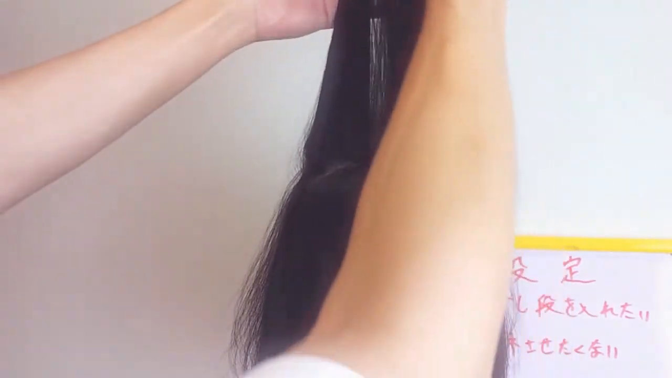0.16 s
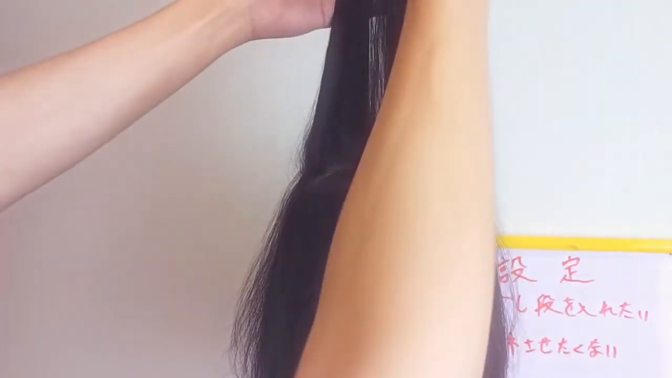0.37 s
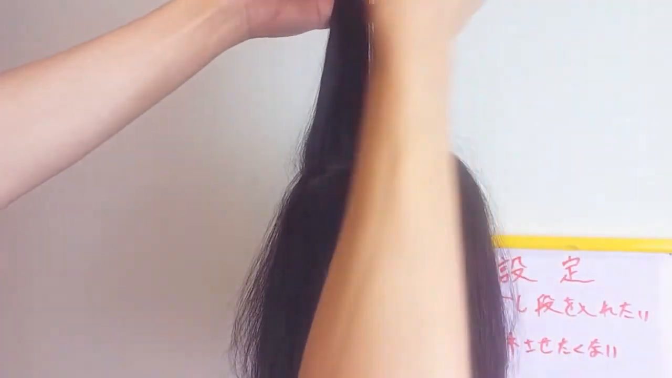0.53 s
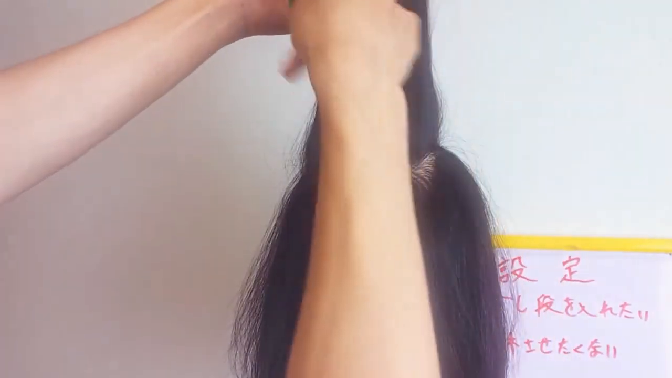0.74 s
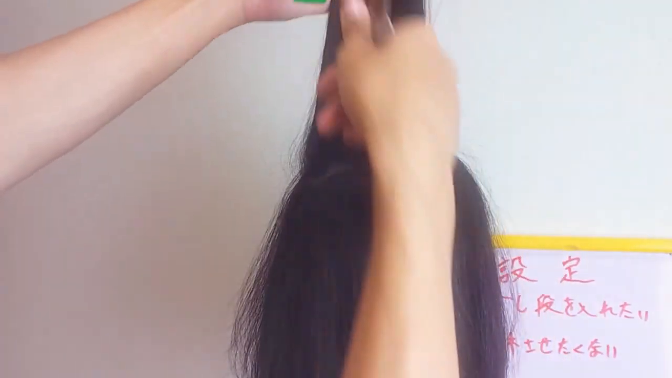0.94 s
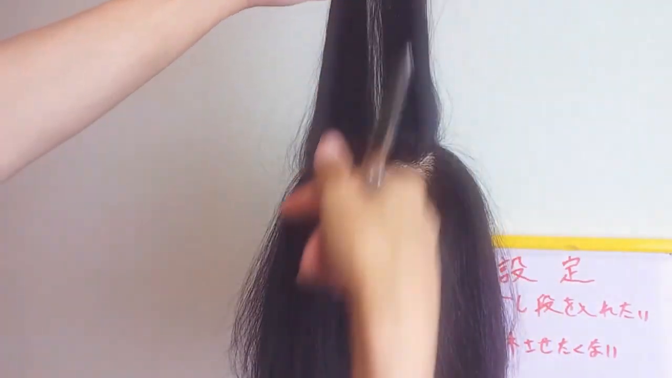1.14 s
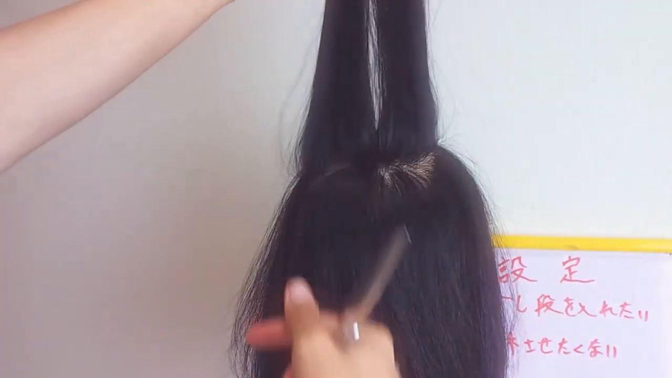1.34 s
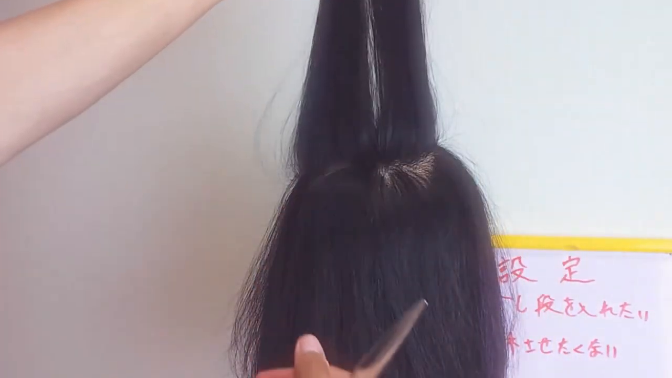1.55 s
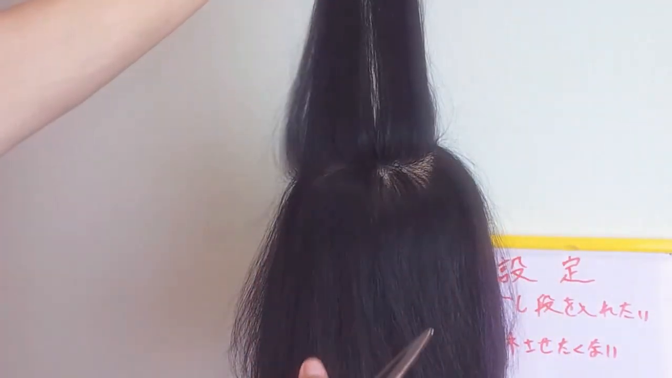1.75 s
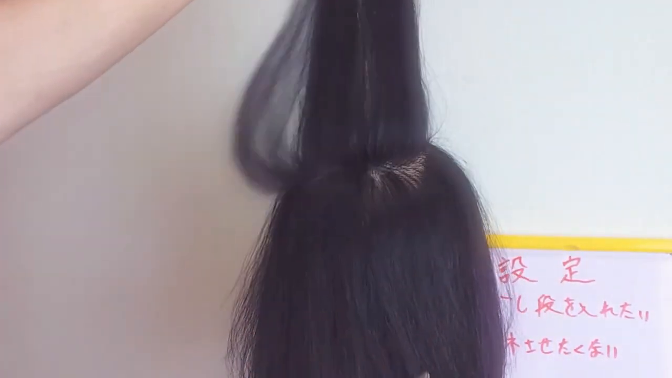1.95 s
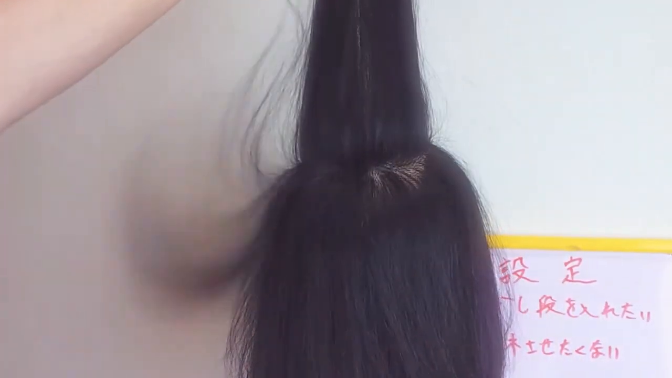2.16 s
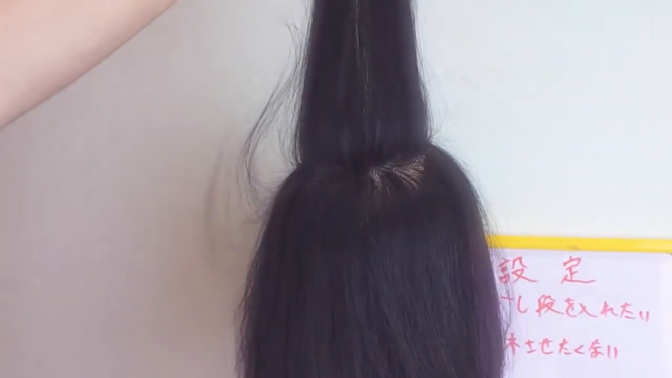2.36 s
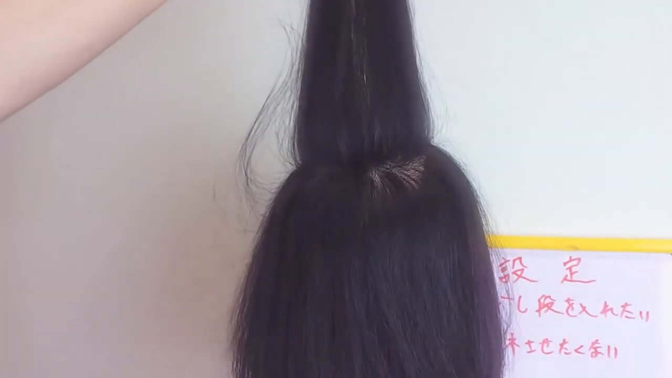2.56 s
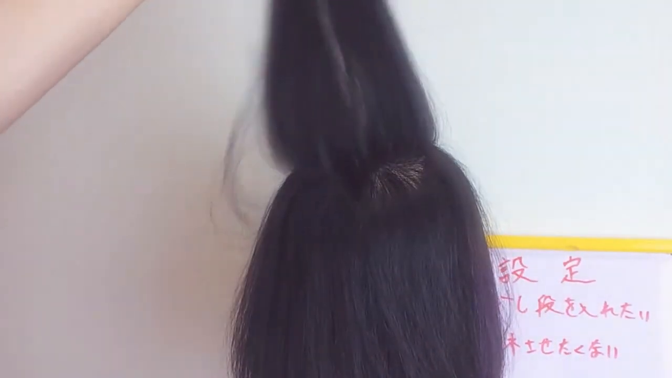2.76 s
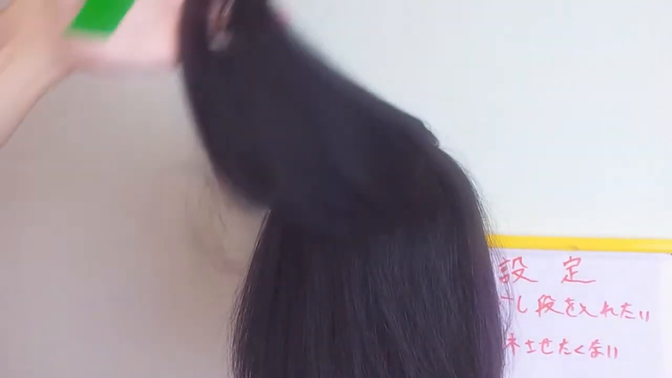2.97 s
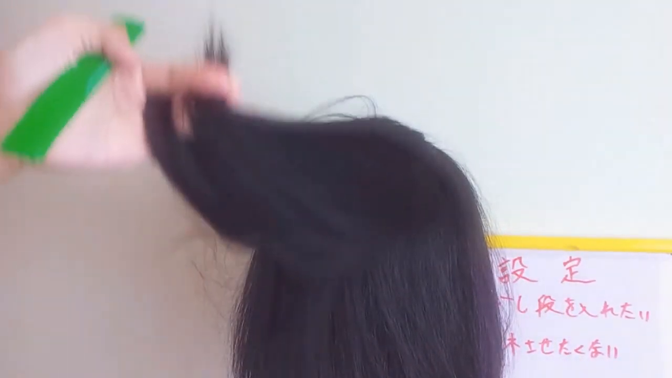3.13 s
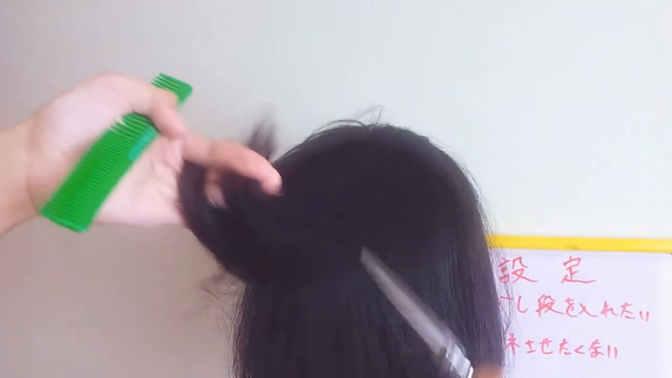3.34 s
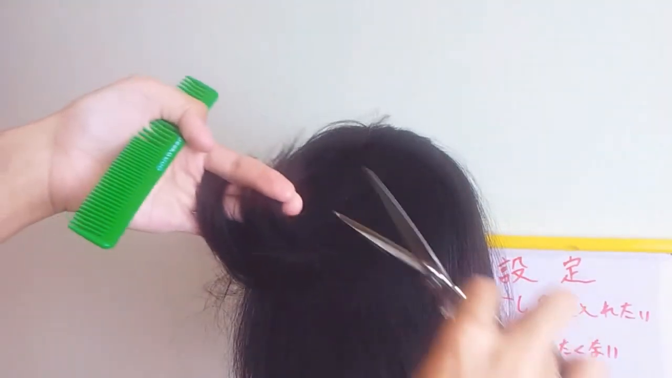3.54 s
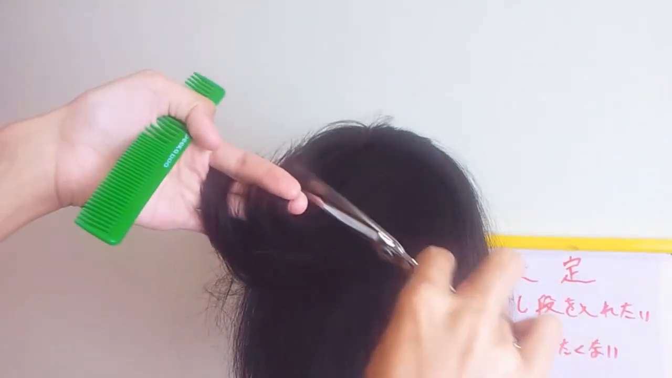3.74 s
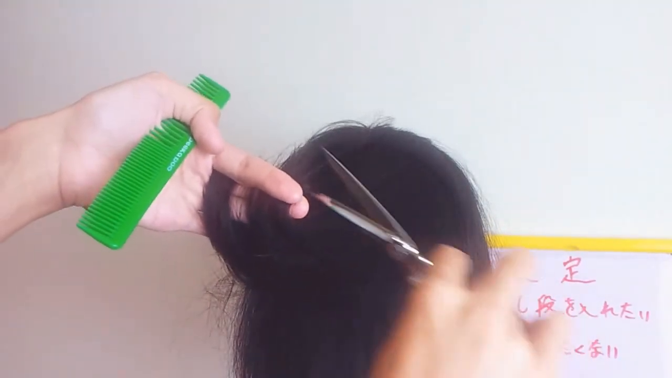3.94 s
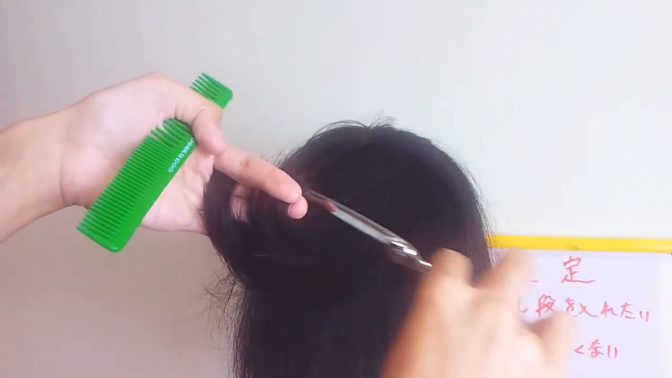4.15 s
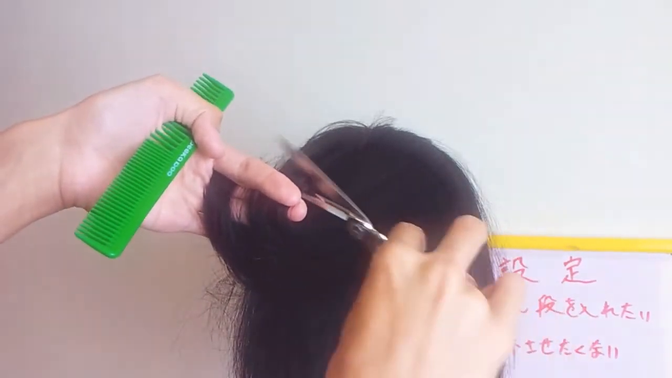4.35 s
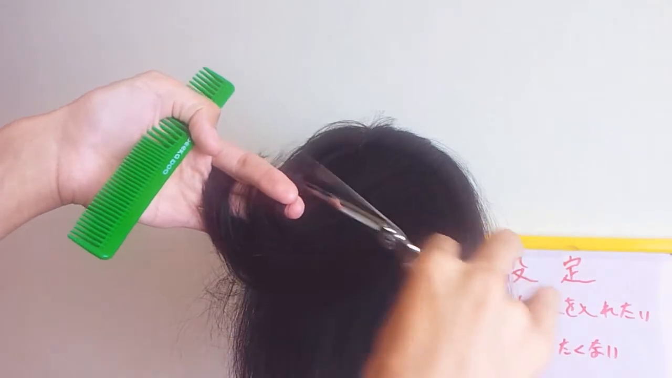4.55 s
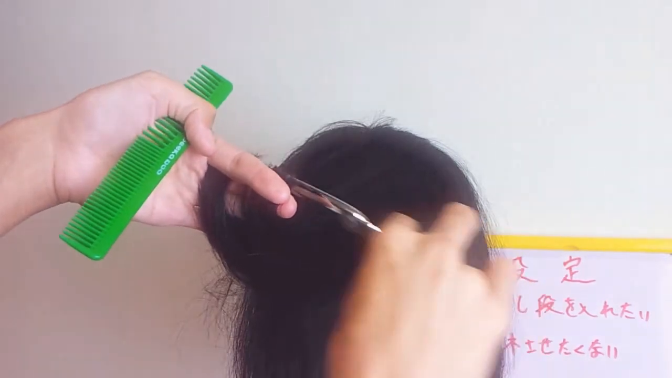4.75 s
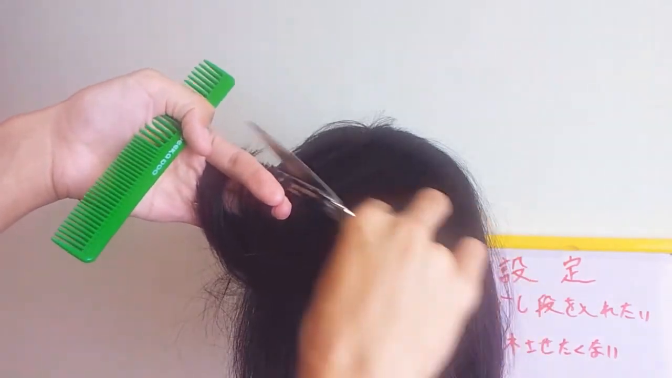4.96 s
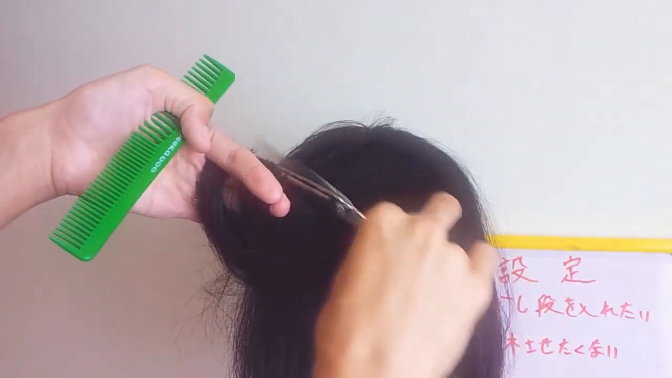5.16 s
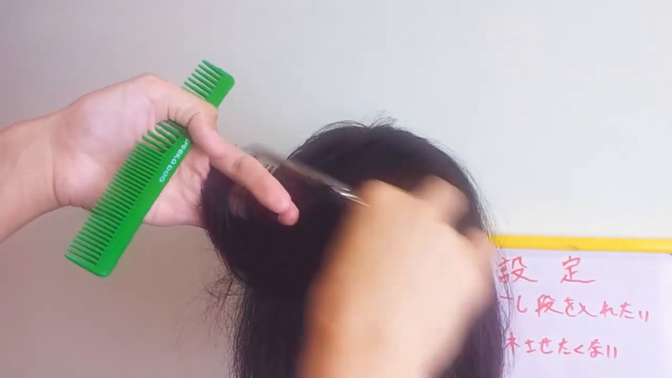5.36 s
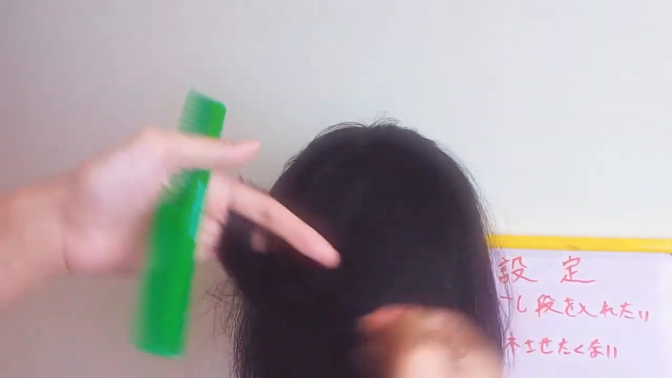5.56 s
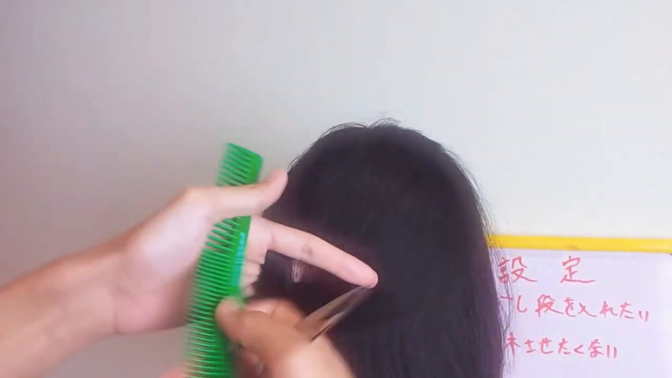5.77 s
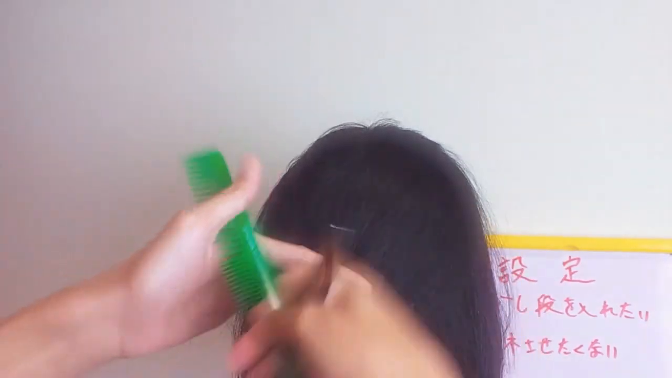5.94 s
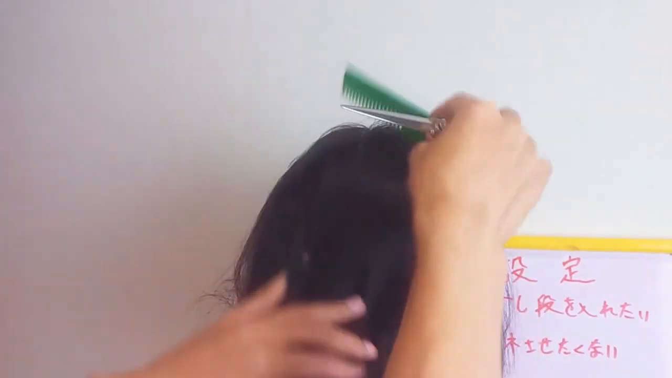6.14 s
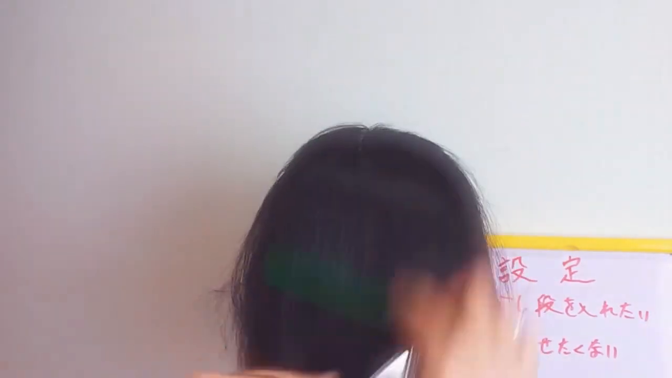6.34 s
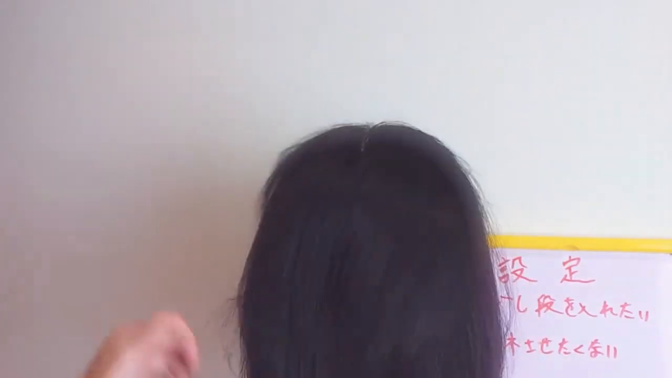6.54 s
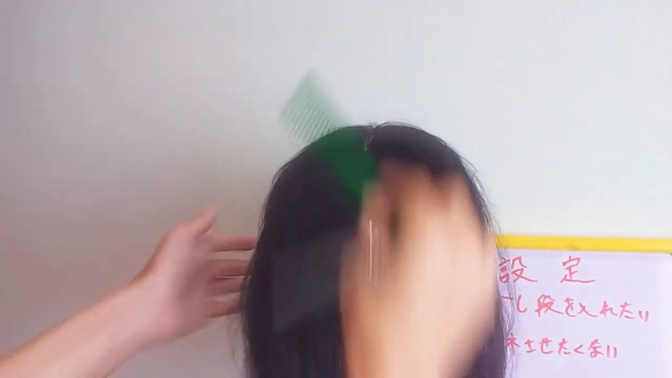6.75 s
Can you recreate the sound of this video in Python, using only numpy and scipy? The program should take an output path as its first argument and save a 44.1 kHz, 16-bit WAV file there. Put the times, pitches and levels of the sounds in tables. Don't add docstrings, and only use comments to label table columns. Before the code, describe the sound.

One sharp metallic snip stands alone over faint hiss and a far fan hum. Later, scissors cut repeatedly at about three per second, each thin blade slide ending in a crisp snap with a short room echo. Loud and soft cuts mix, then a duller clack. Finally, a comb lands lightly on a hollow head, its teeth scraping and strands hissing in short strokes.

```python
import sys
import numpy as np
from scipy import signal
from scipy.fft import rfft, irfft
from scipy.io import wavfile
from scipy.ndimage import uniform_filter1d

SR = 44100
rng = np.random.default_rng(int(sys.argv[2]) if len(sys.argv) > 2 else 0)


def output_pcm(signal):
    pcm = np.clip(np.atleast_2d(signal).T, -1, 1) * 32767
    wavfile.write(sys.argv[1], SR, np.round(pcm).astype(np.int16))


def decibels_to_gain(level_db):
    exponent = np.asarray(level_db, float) / 20
    return 10 ** exponent


N = 299880


def evened(x):
    return x / np.sqrt(np.mean(x ** 2) + 1e-20)


def read(points, hz):
    f, value = np.transpose(points)
    return np.interp(np.log(hz + 1), np.log(f + 1), value)


def add(mix, s, sound):
    part = mix[..., round(s * SR):][..., :sound.shape[-1]]
    part += sound[..., :part.shape[-1]]


def coloured(x, points):
    gain = decibels_to_gain(read(points, np.fft.rfftfreq(len(x), 1 / SR)))
    return evened(irfft(rfft(x) * gain, len(x)))


def resonate(x, hz, width):
    return signal.lfilter(*signal.iirpeak(hz, hz / width, SR), x)


def ringing(modes, detune, colour=((SR, 0),), uneven_db=0.0):
    t = np.arange(3000) / SR
    out = np.zeros(len(t))
    for k, (hz, db, t60) in enumerate(modes):
        shift, weight = rng.standard_normal(2)
        level = decibels_to_gain(db + read(colour, hz) + uneven_db * weight - 60 * t / t60)
        out += (-1) ** k * level * np.sin(2 * np.pi * hz * (1 + detune * shift) * t)
    return out


def grains(count, per_s, spread_db):
    size = decibels_to_gain(spread_db * np.minimum(rng.exponential(1, count), 4))
    size = size * rng.choice([-1., 1.], count)
    return evened(size * (rng.random(count) < per_s / SR))


# frequency in Hz, level in dB, decay t60 in seconds.
STEEL_MODES = [(2740, -3, 0.0043), (3220, -7, 0.0064), (4180, 0, 0.0049), (5150, 2.5, 0.0032),
               (5810, 1, 0.0052), (6800, 4.5, 0.0036), (7790, 0, 0.0028), (8690, -0.5, 0.0028),
               (9860, 1, 0.0036), (11000, 5.5, 0.003), (11080, -9.5, 0.0026), (12030, 4, 0.0013),
               (12970, 0, 0.0059), (14000, -0.5, 0.0036), (14050, -24.5, 0.0062), (15660, -4, 0.0043)]


def snap(s, peak_db, knock_db, ring_db, tip_db, rebound_db):
    t = np.arange(700) / SR
    chatter, bounce = rng.standard_normal((2, len(t)))
    blow = (t == 0) + resonate(0.16 * np.exp(-t / 0.001) * chatter, 11900, 6400)
    rebound = decibels_to_gain(rebound_db) * np.exp(-((t - 0.0034) / 0.0015) ** 2)
    blow += resonate(0.35 * decibels_to_gain(3) * rebound * bounce, 10700, 4900)

    colour = [(3000, 1.25 * knock_db), (6800, knock_db), (8900, ring_db), (10700, 0), (13200, tip_db)]
    modes = ringing(STEEL_MODES, 0.008, uneven_db=1.2)
    click = 3.5 * signal.unit_impulse(len(modes))
    body = coloured(np.roll(modes + click, 40), colour)

    direct = signal.fftconvolve(blow, body)
    spread = np.pad(body, (0, len(t) - 1)) * np.linalg.norm(blow)
    return s - 0.0001, decibels_to_gain(peak_db) * np.array([direct, spread]) / abs(direct).max()


# singing frequency in Hz, low-mode level in dB.
PIVOT_DULLNESS = [(3200, 6), (6500, -1), (11000, -8), (13500, -16.5)]


def slide(start, end, start_db, end_db, sing_hz):
    count = round((end - start) * SR)
    swell = decibels_to_gain(np.linspace(start_db, end_db, count)) * signal.windows.tukey(count, 0.1)
    slips = grains(count, 9000, 1.3) * swell
    body = ringing(STEEL_MODES, 0.03, [(6800, read(PIVOT_DULLNESS, sing_hz)), (9000, 0.0096)])
    song = ringing([(sing_hz, 0, 0.008)], 0.0047)
    body = body / np.linalg.norm(body) + 0.55 * song / np.linalg.norm(song)
    return start, signal.fftconvolve(slips, body)


# time in seconds, peak in dB, handle knock in dB, 9 kHz ring in dB,
# rebound in dB.
SNAPS = [
    (0.3897, -14, -12, 11.5, -17.5),
    (2.8877, -7, -15.5, 4.5, -16),
    (3.3821, -3, -8, 4.5, -13),
    (3.7107, -5, -9.5, 1.5, -14.5),
    (4.026, -11.5, -11, 0.5, -10.5),
    (4.331, -21.5, -13.5, -5, -12),
    (4.627, -12, -11.5, -0.5, -7.5),
    (4.8835, -22.5, -13.5, -3, -8),
    (5.397, -21, -2, 0.5, -3),
]
# time in seconds, peak in dB, handle knock in dB.
TICKS = [(0.0897, -43.5, -7), (1.2894, -56, -4), (2.5107, -49, -11), (2.6509, -44, -6), (3.356, -38, -7),
         (4.316, -42, -2), (4.3224, -45, -11), (5.0741, -52, -8), (5.2594, -58, 0), (5.4925, -48, 17),
         (5.511, -38, -11), (5.737, -54, -7), (5.8188, -43, 1), (6.519, -46, -2), (6.552, -34, -5.5)]
# start and end in seconds, start and end level in dB,
# singing mode in Hz.
SLIDES = [(0.09, 0.13, -64, -72, 3050), (2.75, 2.78, -63, -64, 13200), (2.86, 2.908, -60, -41, 13200),
          (3.35, 3.382, -58, -41, 13500), (3.644, 3.697, -69, -66, 12200), (3.685, 3.715, -56.5, -34, 9930),
          (4.001, 4.015, -50, -54, 6100), (4.012, 4.026, -52, -45, 7930), (4.31, 4.332, -46.5, -62, 6800),
          (4.265, 4.31, -70, -73, 13500), (4.567, 4.6, -75, -67, 14000), (5.395, 5.41, -38, -42, 10700),
          (4.445, 4.49, -66, -67, 14500), (4.606, 4.627, -54, -42, 8800), (4.865, 4.883, -55, -52, 11100),
          (5.085, 5.194, -64, -88, 10500), (5.281, 5.3, -71, -73, 6450)]
# frequency in Hz, level in dB, decay t60 in seconds.
FINGER_RING_MODES = [(1413, -14.5, 0.028), (1944, -18, 0.047), (2750, -10, 0.02), (3650, -6.5, 0.0098),
                     (4680, -11, 0.0078)]


def scissors():
    out = np.zeros((2, N))
    for s, peak_db, knock_db, ring_db, rebound_db in SNAPS:
        tip_db = 6 + 0.58 * peak_db
        add(out, *snap(s, peak_db, knock_db, ring_db, tip_db, rebound_db))
    for s, peak_db, knock_db in TICKS:
        add(out, *snap(s, peak_db, knock_db, ring_db=2, tip_db=-11, rebound_db=-9))
    for row in SLIDES:
        add(out, *slide(*row))
    thin_blades = signal.butter(3, 2220, "high", fs=SR, output="sos")
    out = signal.sosfilt(thin_blades, out)
    add(out, 5.397, decibels_to_gain(-28.5) * ringing(FINGER_RING_MODES, 0.0016))
    return out


# start in seconds, hold in seconds, push on the head in dB,
# teeth scraping in dB, hair hiss in dB.
CONTACTS = [
    (5.785, 0.011, -54.5, -65, -61),
    (5.809, 0.054, -59.5, -55, -56.5),
    (5.898, 0.11, -72, -71, -60),
    (6.031, 0.035, -69, -68.5, -60.5),
    (6.419, 0.024, -56, -60.5, -59),
    (6.49, 0.043, -50, -58, -62),
    (6.54, 0.019, -72, -57, -54.5),
    (6.604, 0.15, -74, -74, -61),
]
RISE_S = (0.017, 0.011, .015)
RELEASE_DB_PER_S = (220, 265, 261)


def contact(layer):
    t = np.arange(N) / SR
    rise = RISE_S[layer]
    power = np.zeros(N)
    for s, hold, *dbs in CONTACTS:
        released = np.maximum(t - s - rise - hold, 0)
        level = decibels_to_gain(dbs[layer] - RELEASE_DB_PER_S[layer] * released)
        power += (np.clip((t - s) / rise, 0, 1) * level) ** 2
    return np.sqrt(power)


# frequency in Hz, width in Hz, level in dB.
HEAD_MODES = [(143.4, 31, 9), (223, 35, 0), (465, 90, -6), (600, 90, -18), (940, 140, -38)]
# frequency in Hz, level in dB per Hz.
TEETH_SPECTRUM = [(210, -47.5), (350, -34), (452, 1.5), (517, -32), (571, -2.5), (1100, -11.5),
                  (1330, -6.5), (2170, -14), (5000, -23.5), (6500, -42), (11000, -120)]
# frequency in Hz, level in dB per Hz.
HAIR_SPECTRUM = [(1470, -46.5), (2500, -13), (2970, -11.5), (3520, -11), (3800, -13.5), (5310, -12),
                 (10500, 0.5), (15200, -7), (16000, -11)]
# time in seconds, peak in dB, pitch in Hz.
LANDINGS = [(5.7898, -49, 1290), (5.818, -46, 1530), (5.86, -58, 624), (6.048, -64, 320), (6.423, -47, 425),
            (6.434, -49.5, 458), (6.498, -49, 627), (6.556, -55, 560), (6.555, -44, 2950),
            (6.761, -63, 635)]


def comb():
    push, scrape, hiss = [contact(layer) for layer in range(3)]
    jolts = grains(N, 700, 4.2)
    head = evened(sum(decibels_to_gain(db) * evened(resonate(jolts, hz, width)) for hz, width, db in HEAD_MODES))
    out = push * head
    out += scrape * coloured(grains(N, 1500, 2.3), TEETH_SPECTRUM)
    out += hiss * coloured(grains(N, 8000, 3.0), HAIR_SPECTRUM)
    for s, peak_db, hz in LANDINGS:
        modes = [(hz, 0, 0.02), (2.17 * hz, -6, 0.012), (200, -5, 0.08)]
        add(out, s, decibels_to_gain(peak_db) * ringing(modes, 0.012))
    return out


# time in seconds, level in dB.
RUSTLE_LEVEL = [(0.0, -68), (0.68, -68), (0.9, -70), (2.0, -73), (3.1, -71), (4.0, -71), (4.8, -71),
                (5.2, -72.5), (5.8, -66)]


def rustle():
    s, db = np.transpose(RUSTLE_LEVEL)
    level = decibels_to_gain(np.interp(np.arange(N) / SR, s, db, right=-99) - 1.5)
    return level * coloured(grains(N, 15000, 2.5), HAIR_SPECTRUM)


# frequency in Hz, level in dB.
ECHO_COLOUR = [(1500, -5.5), (3000, -6.5), (6500, -4.5), (9000, -0.5), (13000, -0.5), (15500, -2)]
# frequency in Hz, decay t60 in seconds.
WALL_DECAY = [(1500, 0.44), (4000, 0.31), (10400, 0.3), (15500, 0.24)]


def room(x):
    taps = np.zeros(SR // 2)
    at = np.arange(200, len(taps) - 14, 14)
    size = decibels_to_gain(3.4 * rng.standard_normal(len(at)))
    taps[at + rng.integers(0, 14, len(at))] = rng.choice([-1., 1.], len(at)) * size
    hz, t, z = signal.stft(taps, SR, nperseg=128)
    level_db = read(ECHO_COLOUR, hz)[:, None] - 60 * t / read(WALL_DECAY, hz)[:, None]
    tail = signal.istft(z * decibels_to_gain(level_db), SR, nperseg=128)[1]
    tail = tail * (1 - np.exp(-np.arange(len(tail)) / SR / 0.0009))
    return signal.fftconvolve(x, tail / np.linalg.norm(tail))[:N]


# frequency in Hz, level in dB per Hz.
AIR_SPECTRUM = [(12, -66), (20, -38), (44, -13.5), (187, -3.5), (234, -9), (285, -10), (310, -3),
                (410, -8.5), (446, -5.5), (897, -10), (1150, -14), (2990, -19), (10500, -18), (16000, -17)]
# frequency in Hz, width in Hz, level in dB.
FAN_LINES = [(237, 31, -76.5), (313.1, 5.1, -76.5), (450.5, 10.4, -82), (692.3, 30.6, -81.5),
             (917, 21.5, -81.5), (1599, 20, -87)]


def air():
    frames, hz = N // 256 + 5, np.fft.rfftfreq(1024, 1 / SR)
    a, b, patches = rng.standard_normal((3, 513, frames))
    patches = evened(uniform_filter1d(uniform_filter1d(patches, 14, 1), 30, 0))
    z = (a + 1j * b) * decibels_to_gain(read(AIR_SPECTRUM, hz)[:, None] + 0.63 * patches)
    out = decibels_to_gain(-66) * evened(signal.istft(z, nperseg=1024, noverlap=768)[1][:N])
    for line_hz, width, db in FAN_LINES:
        out += decibels_to_gain(db) * evened(resonate(rng.standard_normal(N), line_hz, width))
    return out


def scene():
    steel, spread = scissors()
    plastic = comb()
    turn = np.pi * np.arange(N) / SR / 0.7
    near = spread + decibels_to_gain(-3.5) * plastic
    echoes = room(near * np.cos(turn)) + room(near * np.sin(turn))
    return (steel + plastic + decibels_to_gain(-4) * echoes + rustle() + air())[None]


def band_limit(x):
    return signal.sosfilt(signal.butter(12, 16970, fs=SR, output="sos"), x)


def record(dry):
    thin = signal.sosfilt(signal.butter(2, 55.6, "high", fs=SR, output="sos"), dry)
    band_edge = signal.firwin(401, 15750, window=("kaiser", 6), fs=SR)
    limited = signal.oaconvolve(thin, band_edge[None], "same")
    leak = decibels_to_gain(-32) * (thin - limited)
    return band_limit(limited + leak)


dry = scene()
out = record(dry)
output_pcm(out)
```